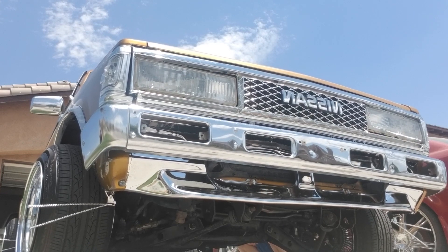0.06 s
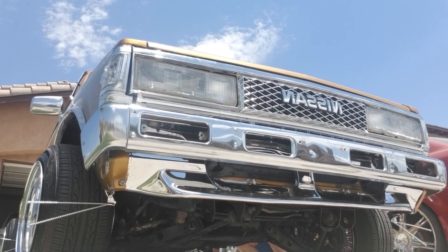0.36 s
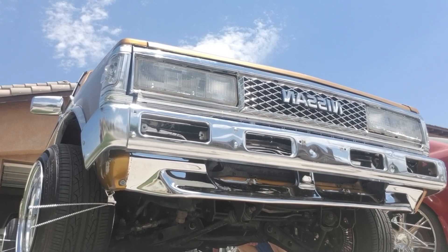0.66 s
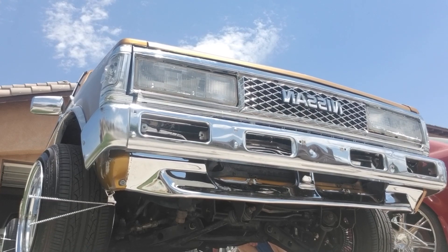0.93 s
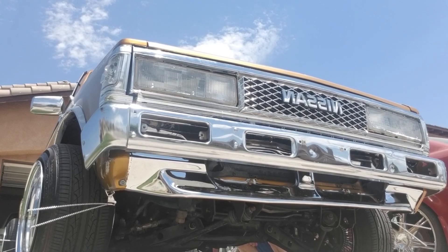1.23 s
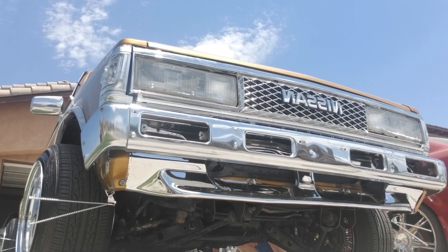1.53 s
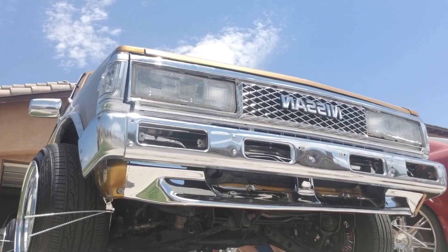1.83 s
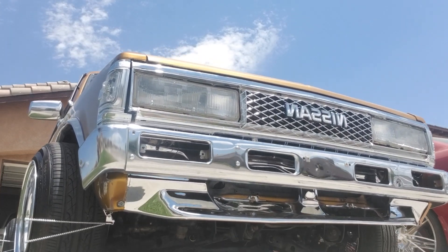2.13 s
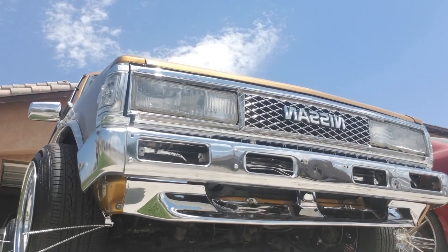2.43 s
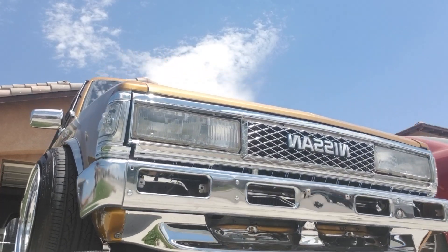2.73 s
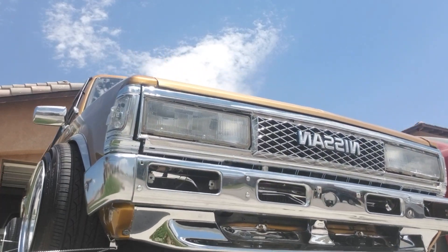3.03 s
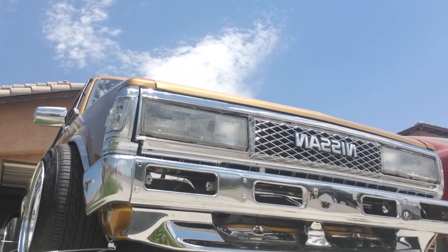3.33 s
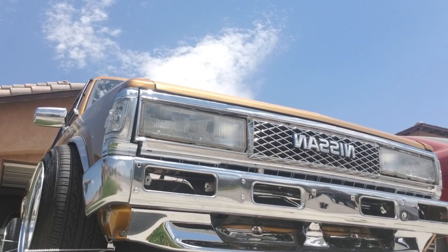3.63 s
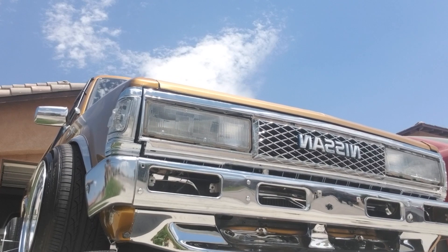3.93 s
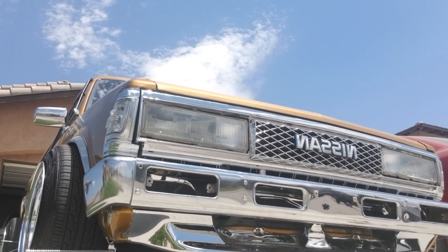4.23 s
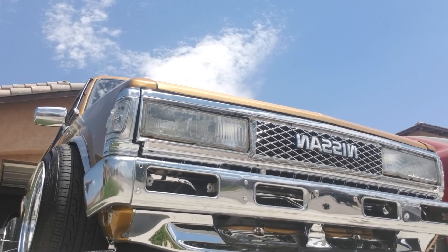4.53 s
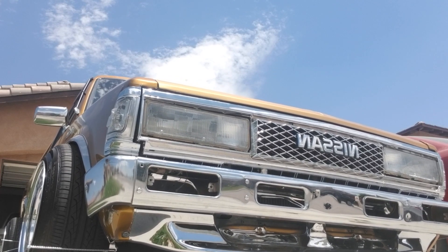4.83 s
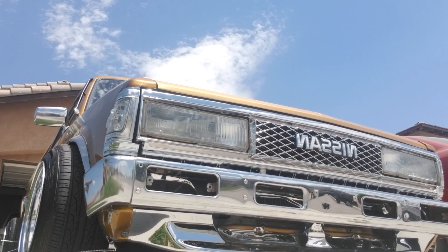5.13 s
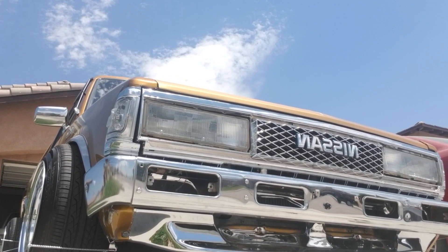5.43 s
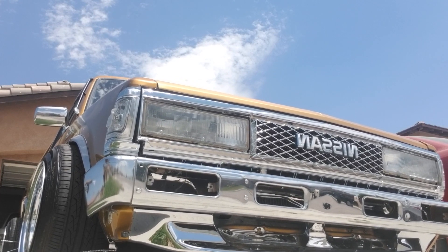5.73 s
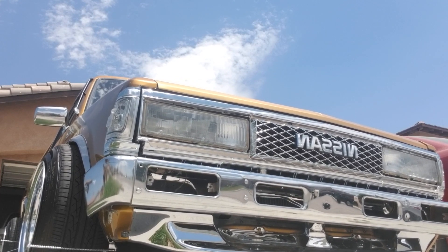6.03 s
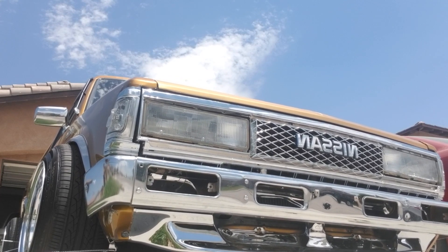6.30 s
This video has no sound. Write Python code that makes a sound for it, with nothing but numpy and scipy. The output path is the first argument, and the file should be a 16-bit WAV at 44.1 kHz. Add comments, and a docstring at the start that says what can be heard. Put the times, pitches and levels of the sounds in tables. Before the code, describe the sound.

A pickup lowers its front with clicks, crunching jerks and a loud ratcheting landing, followed by soft squeaks and a low outdoor hum.

```python
"""A driveway, just below the bumper of a lowrider pickup that dumps its raised front hydraulics.
The valve clunks open and oil fizzes through it. The suspension sinks in jerks, joints crunching and
bushings groaning, then lands, and a coil spring ratchets into its seat. The truck rocks on rubber that
rubs and squeaks as it sticks and slips, over outdoor rumble and a low wandering hum."""
import sys
import numpy as np
from scipy import signal
from scipy.fft import rfft, irfft, next_fast_len
from scipy.io import wavfile

SR = 44100
rng = np.random.default_rng(int(sys.argv[2]) if len(sys.argv) > 2 else 0)


def persist_wave(psi):
    """Save psi, clipped to +-1, as 16-bit WAV."""
    counts = np.round(np.clip(psi, -1, 1) * 32767).astype(np.int16)
    wavfile.write(sys.argv[1], SR, np.atleast_2d(counts).T)


N = 280564
TIME = np.arange(N) / SR
CUTOFF_HZ = 16200


def from_db(db):
    """Decibels to gain."""
    return 10 ** (np.asarray(db) / 20)


def rms_one(x):
    """Scale to unit power."""
    return x / np.sqrt(np.mean(x ** 2) + 1e-20)


def in_time(rows):
    """An automation curve, read at every sample."""
    return np.interp(TIME, *np.transpose(rows))


def fade(t, start, end):
    """Gate with soft 10 ms edges."""
    return np.clip(np.minimum(t - start, end - t) / .01 + 1, 0, 1)


def colour(x, points, tilt_db=0):
    """EQ by a curve; above 1 kHz, add a tilt per octave that pivots on 4 kHz."""
    size = next_fast_len(x.shape[-1])
    octave = np.log2(np.maximum(np.fft.rfftfreq(size, 1 / SR), 1) / 4000)
    hz, db = np.transpose(points)
    gain = from_db(np.interp(octave, np.log2(hz / 4000), db) + tilt_db * np.maximum(octave, -2))
    return irfft(rfft(x, size) * gain, size)[..., :x.shape[-1]]


def filtered(x, hz, kind, order=2):
    """Causal Butterworth filter."""
    return signal.sosfilt(signal.butter(order, hz, kind, fs=SR, output="sos"), x)


def drift(per_s, size=N):
    """Smooth random wander of spread about 1."""
    position = np.arange(size) * per_s / SR
    count = int(position[-1]) + 2
    return np.interp(position, np.arange(count), rng.standard_normal(count))


def grains(per_s, spread_db, size=N):
    """Tiny clicks at random moments, of uneven strength."""
    hits = rng.random(size) < per_s / SR
    return hits * rng.standard_normal(size) * from_db(spread_db * rng.standard_normal(size))


def dying(t60, size):
    """Decay that loses 60 dB in t60 seconds."""
    return from_db(-60 * TIME[:size] / t60)


def struck(rise_s, t60, size):
    """Envelope of a hit: quick attack, then decay."""
    return dying(t60, size) * (1 - np.exp(-TIME[:size] / rise_s))


def add(out, s, x):
    """Mix x in at s seconds."""
    at = max(int(s * SR), 0)
    out[at:at + len(x)] += x[:N - at]


# Tone of the rumble and of the still air. Each row: frequency in Hz, gain in dB.
RUMBLE_EQ = [(22, -19), (45, -8), (65, -3), (120, -1.5), (160, -9.5), (220, -7.5), (320, -13), (500, -22.5),
             (700, -25), (1130, -26), (1450, -48.5), (2500, -58.5), (5000, -72.5)]
AIR_EQ = [(22, -26.5), (70, -0.5), (125, -16.5), (190, -31.5), (300, -12.5), (420, -7.5), (520, -19.5),
          (700, -26), (1400, -32.5), (5000, -43), (10500, -44), (13000, -40), (16000, -43)]
# Fader ride of the rumble. Each row: time in seconds, relative level in dB.
RUMBLE_RIDE = [(0.0, -70), (0.87, -66.5), (0.96, -55.5), (1.95, -50), (2.32, -47), (2.97, -43.5),
               (3.24, -47), (5.99, -53.5), (6.36, -46.5)]


def outdoors(apart_hz=1500):
    """The bed: rumble and hum lean right, while high air and a thin hiss differ from side to side."""
    rumble = rms_one(colour(rng.standard_normal(N), RUMBLE_EQ)) * from_db(in_time(RUMBLE_RIDE) + 4)
    air = rms_one(colour(rng.standard_normal((2, N)), AIR_EQ)) * from_db(-61.5)
    hiss = rms_one(filtered(rng.standard_normal((2, N)), [12225, 12575], "band")) * from_db(-85)
    lows = rumble + hum() + filtered(air[0], apart_hz, "low")
    return lows * from_db([[-6.5], [0]]) + filtered(air, apart_hz, "high") + hiss


def swells(rows, depth_db=20.5, release_share=0.46):
    """Each move gathers speed to a peak and stops faster than it began."""
    gain = np.zeros(N)
    for s, swell_s, db in rows:
        away = (TIME - s) / np.where(TIME < s, swell_s, release_share * swell_s)
        gain += from_db(db - depth_db * np.minimum(away ** 2, 10))
    return gain


# Rushes of oil. Each row: peak time in seconds, swell in seconds, level in dB.
OIL_RUSHES = [(.855, 0.025, -47.5), (1.99, 0.165, -57.5), (2.78, 0.15, -35.5)]


def oil_fizz():
    """Oil rushes through the valve with a high fizz as the cylinders move."""
    fizz = filtered(grains(per_s=15000, spread_db=9.5), [11500, 14000], "band")
    return rms_one(fizz) * swells(OIL_RUSHES)


# Tone of the steel parts. Each row: frequency in Hz, gain in dB.
STEEL_EQ = [(500, -4.5), (1080, -7.5), (1300, -5.5), (1650, 2), (2100, -3), (2700, 2.5), (3400, 3.5),
            (4300, -4), (5600, -2), (6600, -2), (7600, -7), (10000, -10), (13000, -13), (16000, -23.5)]


def chatter(tilt_db, t60, rise_s, per_s, spread_db, size=SR // 2):
    """One slip of steel on steel: a dying run of tiny contacts."""
    contacts = colour(grains(per_s, spread_db, size), STEEL_EQ, tilt_db)
    return rms_one(contacts) * struck(rise_s, t60, size)


# Modes of the coil spring. Each row: pitch in Hz, relative level in dB, 60 dB decay time in seconds.
SPRING_MODES = [(257, -9, 1.0), (460, 0.5, 1.4), (582.3, 5, 1.87), (680, 7.5, 0.67), (978, 10, 0.47),
                (1067, 8.5, 0.63), (1882, -6.5, 1.6), (3390, 0, 0.74)]


def steelwork(rattle_db=5, blur_rad=1.36, bracket_t60=0.27, size=SR):
    """Ring of the rattling coil spring and the many small, loose arms and brackets around it."""
    t = TIME[:size]
    coil, brackets = np.zeros((2, size))
    for hz, db, t60 in SPRING_MODES:
        level = from_db(db - 25 + rattle_db * drift(45, size))
        coil += level * np.sin(2 * np.pi * hz * t) * dying(t60, size)
    for hz in 1500 * 10 ** rng.random(150):  # modes from 1.5 to 15 kHz
        strength = rng.normal() * np.sqrt(hz)
        brackets += strength * np.sin(2 * np.pi * hz * t + blur_rad * drift(130, size))
    brackets = rms_one(colour(brackets, STEEL_EQ, tilt_db=0.4)) * dying(bracket_t60, size)
    damping = np.cos(np.pi / 2 * t / t[-1])
    return damping * (coil + brackets)


# The valve snaps, then the spring ratchets into its seat.
# Each row: start in seconds, relative level of the crack in dB, relative level of the ring in dB.
STEEL_SNAPS = [(.836, -46, -53.5), (.850, -57, -58.5), (1.726, -41.5, -64.5), (2.670, -24.5, -34.5),
               (2.731, -20.5, -25.5), (2.773, -20.5, -35), (2.849, -28.5, -36), (2.888, -27.5, -44),
               (2.936, -23.5, -43), (2.987, -25.5, -46), (3.040, -20.5, -45), (3.097, -28.5, -33.5),
               (3.116, -25, -43.5), (3.428, -38.5, -38), (3.926, -45.5, -60), (4.013, -55.5, -52)]


def snaps():
    """Steel snaps with a bright crack and sets the steelwork ringing."""
    cracks, blows = np.zeros((2, N))
    for s, crack_db, ring_db in STEEL_SNAPS:
        crack = chatter(tilt_db=3.5, t60=0.061, rise_s=0.0045, per_s=9000, spread_db=0)
        add(cracks, s, from_db(crack_db) * crack)
        blows[int(s * SR)] = from_db(ring_db)
    return cracks + signal.fftconvolve(blows, steelwork())[:N]


# Jolts of valve, cylinders and chassis.
# Each row: start in seconds, relative level in dB, centre in Hz, 60 dB decay time in seconds.
JOLTS = [(0.837, -35.5, 537, 0.64), (0.866, -25.5, 370, 0.18), (.957, -31, 520, 0.19),
         (1.666, -23.5, 343, 0.27), (1.684, -22.5, 127.4, 0.27), (1.738, -33.5, 624, 0.22),
         (1.795, -37.5, 710, 0.17), (1.932, -33, 355, 0.41), (1.995, -35, 730, 0.47),
         (2.217, -36.5, 380, 0.28), (2.453, -27.5, 576, 0.25), (2.680, -29, 420, 0.82),
         (2.709, -24.5, 740, 0.47), (2.734, -23, 95, 0.6), (2.745, -28.5, 230, 0.71),
         (2.891, -25, 440, 0.26), (3.044, -31, 360, 0.39), (3.122, -28.5, 800, 0.19),
         (3.794, -31.5, 770, 0.13), (3.927, -41, 706, 0.3), (4.016, -39.5, 796, 0.085)]


def knocks(width_octaves=1.95, rise_s=0.0035, lowpass_hz=1150, size=SR // 2):
    """Each jolt is a dull, broad chassis thud; a steep low-pass keeps it dark."""
    out, half_band = np.zeros(N), 2 ** (width_octaves / 2)
    for s, db, hz, t60 in JOLTS:
        envelope = struck(rise_s, t60, size)
        shake = filtered(rng.standard_normal(size) * envelope, [hz / half_band, hz * half_band], "band")
        shake = filtered(shake, lowpass_hz, "low", order=6)
        add(out, s, from_db(db) * rms_one(shake) * np.sqrt(np.mean(envelope ** 2)))
    return out


# Crunches in the joints. Each row: start in seconds, relative level in dB.
JOINT_CRUNCHES = [(0.843, -43.5), (.957, -48.5), (1.665, -39), (1.727, -48), (1.794, -44), (1.918, -39),
                  (1.944, -41.5), (1.986, -48), (2.011, -46), (2.154, -48.5), (2.224, -54.5), (2.458, -38),
                  (2.569, -46), (2.708, -22.5), (2.849, -32), (3.749, -56), (3.794, -53), (3.925, -51),
                  (4.014, -44), (4.304, -55)]


def crunches():
    """Steel joints slip under load with a dull crunch."""
    out = np.zeros(N)
    for s, db in JOINT_CRUNCHES:
        add(out, s, from_db(db) * chatter(tilt_db=-7, t60=0.19, rise_s=0.0069, per_s=4300, spread_db=-1))
    return out


# Groans of the bushings.
# Each row: start in seconds, relative level in dB, opening pitch in Hz, 60 dB decay time in seconds.
BUSHING_GROANS = [(0.858, -34, 412.7, 0.26), (.899, -16, 617, 0.029), (.907, -38, 259.5, 0.34),
                  (2.482, -28, 731, 0.14), (3.231, -33.5, 285, 0.14), (3.591, -26.5, 357, 0.045)]


def groans(sag_octaves_per_s=3.6, roughness=.05, rise_s=0.0054, size=SR // 2):
    """A twisting bushing gives a short rough tone that sags as the load eases."""
    out, t = np.zeros(N), TIME[:size]
    for s, db, hz, t60 in BUSHING_GROANS:
        pitch = hz * 2 ** (-sag_octaves_per_s * t) * (1 + roughness * drift(420, size))
        tone = np.sqrt(2) * np.sin(2 * np.pi * np.cumsum(pitch) / SR)
        add(out, s, from_db(db) * tone * struck(rise_s, t60, size))
    return out


# Pitch line of the hum. Each row: time in seconds, pitch in Hz.
HUM_GLIDE = [(0.9, 80.5), (1.81, 88.5), (2.37, 76.5), (2.85, 75), (3.12, 78.5), (5.98, 87.5), (6.21, 93.4),
             (6.36, 90)]
# Its fader ride, held at the first value until then. Each row: time in seconds, relative level in dB.
HUM_RIDE = [(3.3, -59), (3.87, -46), (3.96, -57), (4.03, -41), (4.65, -44), (4.82, -65), (4.9, -55),
            (5.49, -48.5), (5.55, -58), (5.62, -46.5), (6.17, -49), (6.36, -43)]


def hum(start_s=0.91, rise_s=0.14, waver_db=3.5):
    """A low, almost pure hum, like a far exhaust, sets in and wanders in pitch."""
    pitch = in_time(HUM_GLIDE) * (1 + 0.0099 * drift(25))
    phase = 2 * np.pi * np.cumsum(pitch) / SR
    tone = np.sqrt(2) * (np.sin(phase) + from_db(-19) * np.sin(2 * phase))
    onset = np.clip((TIME - start_s) / rise_s, 0, 1)
    return tone * onset * from_db(in_time(HUM_RIDE) + 1.5 + waver_db * drift(30))


def friction(eq, per_s, grain_db, judder_db):
    """Sliding surfaces: dense tiny slips that come in judders."""
    slips = grains(per_s, grain_db) * from_db(judder_db * drift(80))
    return rms_one(colour(slips, eq))


# Tone of the scrape. Each row: frequency in Hz, gain in dB.
SCRAPE_EQ = [(400, -1), (1050, 6), (1350, -5.5), (1700, 1), (2100, -4), (3300, 2), (4200, -10),
             (6300, -12.5), (7500, -21.5), (9500, -24.5), (11000, -15), (13500, -26), (16000, -20)]
# Its fader ride. Each row: time in seconds, relative level in dB.
SCRAPE_RIDE = [(1.6, -91), (1.7, -53.5), (1.82, -58.5), (1.85, -54.5), (2.19, -67.5), (2.43, -63.5),
               (2.85, -33.5), (2.92, -51.5), (3.0, -49), (3.22, -59), (3.59, -70), (3.96, -59.5),
               (4.09, -75.5), (4.3, -73.5)]


def suspension_scrape():
    """The suspension scrapes as it sinks, loudest at the landing."""
    level = from_db(in_time(SCRAPE_RIDE) + 10.5) * fade(TIME, SCRAPE_RIDE[0][0], SCRAPE_RIDE[-1][0])
    return friction(SCRAPE_EQ, per_s=6000, grain_db=1.5, judder_db=1.8) * level


# Tone of rubbing rubber. Each row: frequency in Hz, gain in dB.
RUB_EQ = [(400, -3.5), (800, -2), (1150, 12.5), (1450, -3), (2000, -7), (2700, 3.5), (3600, 1.5),
          (4500, -11.5), (6500, -7), (7300, -20), (8600, -13), (9600, -29), (12000, -16), (16000, -33)]
# Its strokes. Each row: peak time in seconds, swell in seconds, level in dB.
RUB_STROKES = [(1.99, 0.18, -45.5), (4.485, .1, -51), (4.70, 0.034, -55.5), (4.815, 0.026, -60),
               (4.89, 0.11, -50.5), (5.10, 0.039, -53.5), (5.28, 0.17, -49.5), (5.47, 0.13, -48.5),
               (5.83, 0.25, -50), (6.235, .13, -49.5)]


def rubber_rub():
    """Rubber slides in grainy swells as the truck sinks and rocks."""
    return friction(RUB_EQ, per_s=6600, grain_db=-4.5, judder_db=-0.5) * swells(RUB_STROKES)


# Rubber squeaks. Each row: moment of top speed in seconds, reach to each side in seconds, top pitch
# in Hz, relative level in dB, roughness at top speed from 0 to 1, overtone tilt in dB per octave.
RUBBER_SQUEAKS = [(2.395, .025, 2206, -40, 0.07, -8.5), (4.425, 0.026, 1072, -56, 0, 0),
                  (4.498, .07, 1480, -58, .25, 0.5), (4.695, 0.019, 1230, -53, 0.54, -6),
                  (4.763, 0.03, 1047, -48, 0.2, -6.5), (4.765, 0.02, 1526, -43, 0.13, -24),
                  (4.811, .025, 1187, -53.5, .3, 0), (4.865, .07, 1077, -57.5, 0.25, -8),
                  (5.316, 0.091, 1203, -60.5, 0, 5.5), (5.322, 0.062, 1780, -50.5, 0, -11),
                  (5.387, 0.12, 1480, -47, 0.02, 2.5), (5.795, 0.13, 1255, -48, .18, 0),
                  (5.80, 0.039, 1505, -43, 0, -11), (6.08, 0.055, 1288, -47.5, 0.08, -15),
                  (6.17, 0.096, 1244, -49.5, 0.65, -7)]
# What the squeaking rubber radiates. Each row: frequency in Hz, gain in dB.
SQUEAK_EQ = [(500, 9.5), (1150, 8.5), (1500, -4), (2100, -3.5), (3000, -1), (4400, -8.5), (6000, -7),
             (7500, -16), (12000, -24), (16000, -36)]


def squeaks(rock_s=.116, jitter=0.33, wobble=0.13, flutter_db=2, blunt_db=5, end_loss_db=11.5):
    """Rubber sticks and slips once a cycle: high and sharp at top speed, low and ragged when slow."""
    out, harmonics = np.zeros(N), np.arange(1, 13)[:, None]
    for s, reach_s, top_hz, db, top_rough, tilt_db in RUBBER_SQUEAKS:
        t = TIME[int((s - reach_s - .01) * SR):int((s + reach_s + .01) * SR)]
        speed = np.exp(-np.abs((t - s) / rock_s) ** 2.25)
        hz = top_hz * speed * (1 + .008 * drift(60, len(t)))
        rough = np.clip(top_rough + 2 * (1 - speed), 0, 1)
        unsteady = jitter * drift(1100, len(t)) + wobble * drift(140, len(t))
        phase = 2 * np.pi * np.cumsum(hz * (1 + rough * unsteady)) / SR
        weights = from_db((tilt_db - blunt_db * rough) * np.log2(harmonics))
        audible = harmonics * hz < CUTOFF_HZ
        slips = np.sqrt(2) * np.sum(weights * audible * np.cos(harmonics * phase), axis=0)
        arc_db = db - 2 - end_loss_db * ((t - s) / reach_s) ** 2
        level = from_db(arc_db + flutter_db * np.sqrt(rough) * drift(160, len(t)))
        add(out, t[0], slips * level * fade(t, s - reach_s, s + reach_s))
    return colour(out, SQUEAK_EQ)


def underbody():
    """Submix of the grainy layers, as radiated in one direction."""
    return suspension_scrape() + rubber_rub() + oil_fizz() + from_db(9) * (crunches() + snaps())


def scatter(x, t60, low_hz, size=SR // 2):
    """Dense reflections, different at each ear; long waves pass the obstacles by."""
    response = rng.standard_normal((2, size)) * dying(t60, size) * (TIME[:size] > .001)
    response = filtered(rms_one(response) / np.sqrt(size), low_hz, "high")
    return signal.fftconvolve(x[None], response, axes=1)[:, :N]


# Shading of the truck on the left side. Each row: frequency in Hz, gain against the right in dB.
LEFT_SHADE_EQ = [(100, -0.5), (450, -7), (1000, -8.5), (2000, -17.5), (5000, -13), (9000, -14.5),
                 (14000, -5.5)]


def driveway(right, left, lag_s=0.00022):
    """Sound reaches the right side first and louder; concrete and the house front scatter it."""
    shaded = np.interp(TIME - lag_s, TIME, colour(left, LEFT_SHADE_EQ))
    echoes = from_db([[-18], [-15]]) * scatter(right, t60=0.29, low_hz=394)
    return np.array([shaded, right]) + echoes


def scene(likeness=0.088):
    """The truck over the outdoor bed; its many small contacts are only slightly alike on the two sides."""
    body = from_db(2.5) * knocks() + from_db(5) * groans() + from_db(-3) * squeaks()
    right = underbody()
    left = likeness * right + np.sqrt(1 - likeness ** 2) * underbody()
    return driveway(body + right, body + left) + from_db(2.5) * outdoors()


def record(dry):
    """A steep low-pass takes off the very top."""
    return signal.sosfilt(signal.ellip(12, .2, 80, CUTOFF_HZ, fs=SR, output="sos"), dry)


dry = scene()
out = record(dry)
persist_wave(out)
```